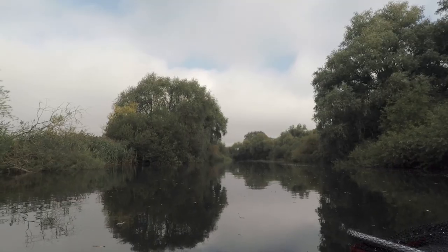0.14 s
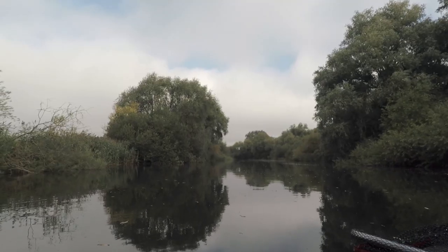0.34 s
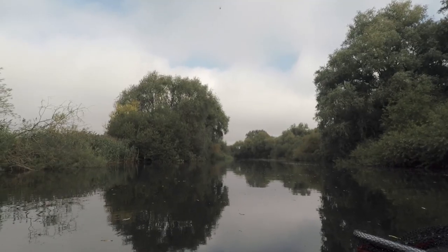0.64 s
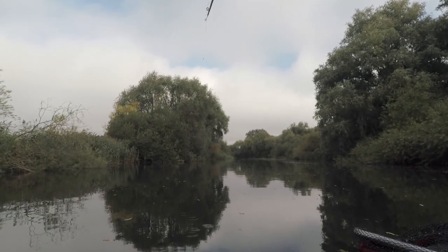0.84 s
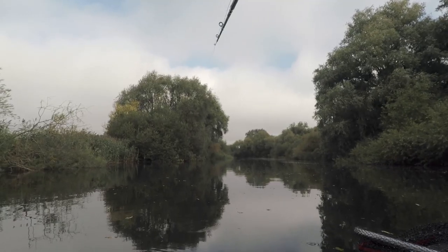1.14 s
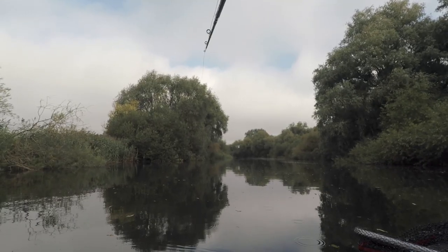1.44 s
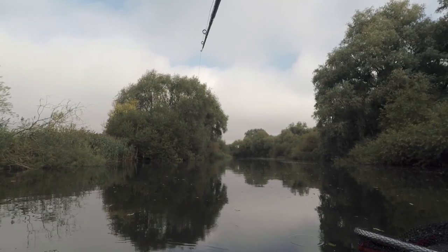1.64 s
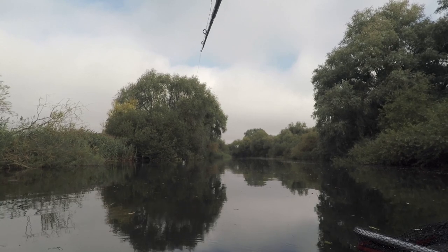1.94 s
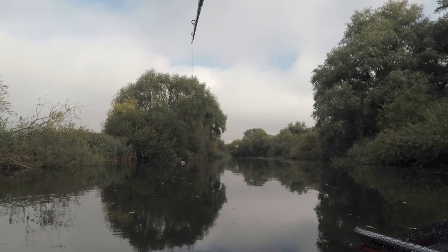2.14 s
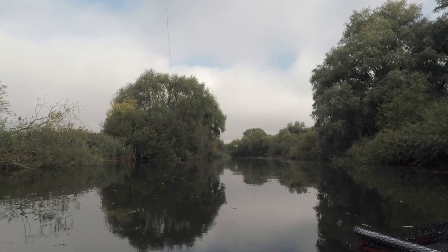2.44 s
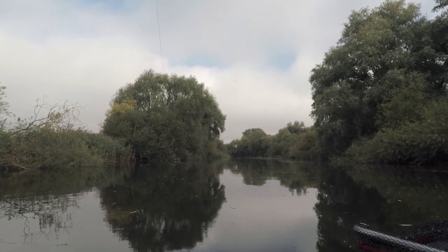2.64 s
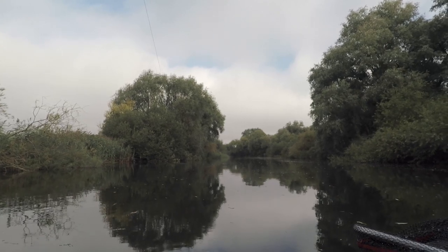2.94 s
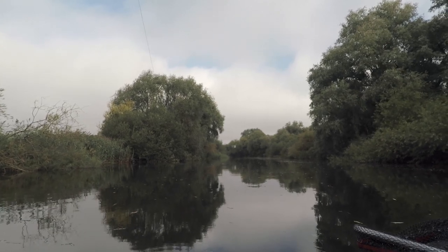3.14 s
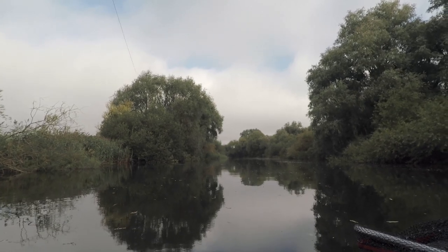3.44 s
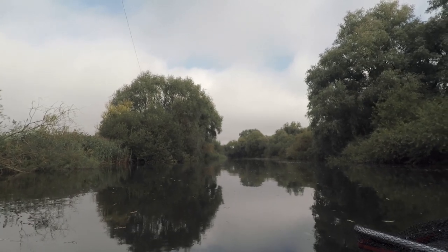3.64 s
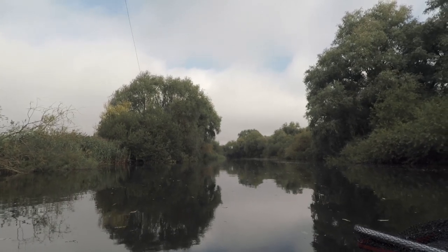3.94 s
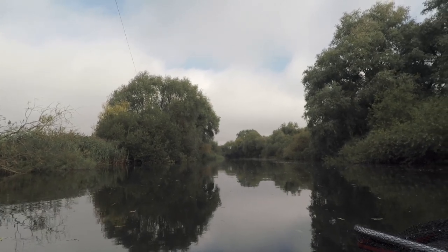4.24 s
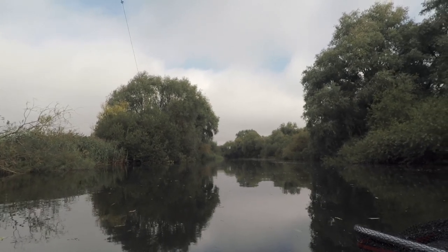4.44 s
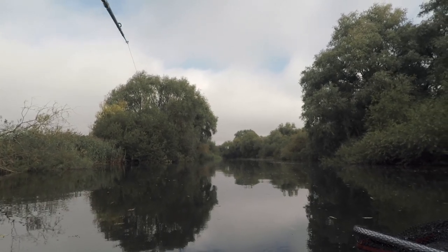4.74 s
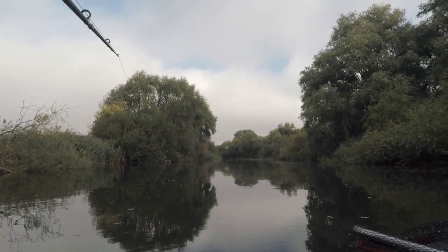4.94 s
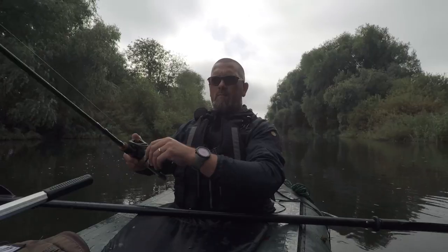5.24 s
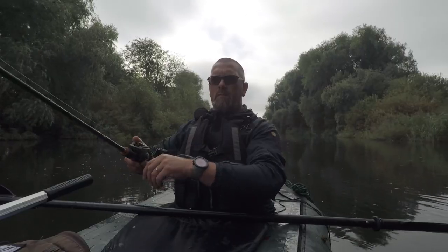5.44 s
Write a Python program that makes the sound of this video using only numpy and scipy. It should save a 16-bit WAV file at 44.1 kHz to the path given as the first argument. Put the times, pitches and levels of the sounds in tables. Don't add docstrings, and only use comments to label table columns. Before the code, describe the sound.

A fishing line is cast with a rising zip and slowing spool whir, a plop follows, then one sharp reel click over low wind rumble.

```python
import sys
import numpy as np
from scipy import signal
from scipy.fft import rfft, irfft
from scipy.io import wavfile
from scipy.ndimage import uniform_filter1d

SR = 44100
rng = np.random.default_rng(int(sys.argv[2]) if len(sys.argv) > 2 else 0)


def gain_from_db(level_db):
    decades = np.asarray(level_db, float) / 20
    return 10 ** decades


def transcribe(signal):
    frames = np.atleast_2d(signal).T
    limited = np.clip(frames, -1, 1)
    pcm = np.round(limited * 32767).astype(np.int16)
    wavfile.write(sys.argv[1], SR, pcm)


N = 247090

# ring_hz [Hz], width_hz [Hz], level_db [dB]
SPOOL_RINGS = [(4850, 300, 5), (9400, 1100, -2.5), (10800, 500, -14), (3800, 270, -6), (1930, 190, -9)]


def rms_one(x):
    return x / np.sqrt(np.mean(x ** 2) + 1e-20)


def in_time(rows):
    start_s, *columns = np.transpose(rows)
    return [np.interp(np.arange(N) / SR, start_s, column) for column in columns]


def swells(rows, rise_db_per_s, fall_db_per_s, column=2):
    t = np.arange(N) / SR
    gain = np.zeros(N)
    for row in rows:
        start_s, hold_s = row[:2]
        rise_db = rise_db_per_s * np.maximum(start_s - t, 0)
        fall_db = fall_db_per_s * np.maximum(t - start_s - hold_s, 0)
        gain += gain_from_db(row[column] - rise_db - fall_db)
    return gain


def drift(rate_hz):
    r = np.exp(-2 * np.pi * rate_hz / SR)
    return rms_one(signal.lfilter([1], [1, -2 * r, r * r], rng.standard_normal(N + SR))[SR:])


def coloured(x, spectrum):
    hz, level_db = np.transpose(spectrum)
    bins = np.maximum(np.fft.rfftfreq(N, 1 / SR), .01)
    gain = gain_from_db(np.interp(np.log(bins), np.log(hz), level_db, left=-120, right=-120))
    return rms_one(irfft(rfft(x) * gain, N))


def filtered(x, order, edge_hz, kind="low"):
    return signal.sosfilt(signal.butter(order, edge_hz, kind, fs=SR, output="sos"), x)


def resonate(x, hz, width_hz):
    r = np.exp(-np.pi * width_hz / SR)
    top = np.array([1, 0, -1]) * (1 - r * r) / 2
    return signal.lfilter(top, [1, -2 * r * np.cos(2 * np.pi * hz / SR), r * r], x + 1e-18)


def burst(at_s, length_s):
    t = np.arange(int(SR * .03)) / SR
    i = int(at_s * SR)
    return slice(i, i + len(t)), rng.standard_normal(len(t)) * np.exp(-t / max(length_s, 2e-4))


def body(x, rings, lift_db, direct_db):
    ringing = sum((-1) ** k * gain_from_db(db) * resonate(x, hz, width) for k, (hz, width, db) in enumerate(rings))
    return gain_from_db(direct_db) * x + gain_from_db(lift_db) * ringing


def shadowed(x):
    shadow_hz, shadow_db = 12600, -13
    return filtered(x, 6, shadow_hz) + gain_from_db(shadow_db) * filtered(x, 6, shadow_hz, "high")


def mellow(x, cut_hz):
    return filtered(x, 1, cut_hz)


def air_levels():
    # start_s [s], level_db [dB]
    gusts = [(0, -35.5), (.54, -28.5), (1.08, -40), (1.15, -29), (1.45, -37), (1.59, -24.5), (1.68, -39.5),
             (2.08, -22), (2.6, -36.5), (2.69, -22.5), (2.85, -32.5), (3.17, -27.5), (3.44, -21.5),
             (3.75, -27), (3.87, -33), (4.2, -30), (4.38, -25.5), (4.7, -35)]
    turn_s = 5.08
    t = np.arange(N) / SR
    last_puff = swells([(turn_s - .1, .05, -33)], 120, 300)
    gust_db = 20 * np.log10(gain_from_db(in_time(gusts)[0]) + last_puff)
    swing_db = gust_db - gust_db.mean()

    open_rumble_db = -57.5 + 1.5 * t + 0.11 * swing_db
    open_low_db = -58 + 0.046 * swing_db
    open_high_db = np.maximum(-58 - 0.71 * t, -62.5)

    sheltered, since_s = t > turn_s, t - turn_s
    return (np.where(sheltered, -38.5 - 16 * since_s, gust_db),
            np.where(sheltered, -60.5, open_rumble_db),
            np.where(sheltered, -54.5 + 2 * since_s, open_low_db),
            np.where(sheltered, -58.5 + 2 * since_s, open_high_db))


def air(lumpy_db):
    # pitch_hz [Hz], level_db [dB per Hz]
    buffet_spectrum = [(1.2, -22), (2, 8), (6, 7), (16, -6.5), (25, -23), (36, -35), (55, -48)]
    rumble_spectrum = [(18, -18), (28, -2), (40, -2), (60, -5), (85, -15), (120, -19.5), (180, -32)]
    low_spectrum = [(59, -8), (100, -2), (207, -3.5), (250, -4), (851, -14), (1500, -20.5), (1950, -29),
                    (3300, -120)]
    high_spectrum = [(590, -8), (1000, 1.5), (1830, -1.5), (2710, -4), (3150, -4), (4020, -4), (7350, -9),
                     (14400, -12), (15500, -17), (16000, -33)]
    buffet_db, rumble_db, low_db, high_db = uniform_filter1d(air_levels(), size=SR // 40)
    white = rng.standard_normal((4, N))
    push = coloured(white[0], buffet_spectrum)
    push = push / np.sqrt(uniform_filter1d(push ** 2, size=SR // 4) + 0.11)
    buffet = gain_from_db(buffet_db) * push
    rumble = gain_from_db(rumble_db + lumpy_db * drift(5.0)) * coloured(white[1], rumble_spectrum)
    low_hiss = gain_from_db(low_db + 1.4 * drift(15.0)) * coloured(white[2], low_spectrum)
    high_hiss = gain_from_db(high_db + 0.73 * drift(6.1)) * coloured(white[3], high_spectrum)
    return buffet + rumble + low_hiss + high_hiss


def spool(grain_db, patchy_db, uneven_db):
    # start_s [s], friction_db [dB], wobble_db [dB]
    spool_run = [
        [(.22, -61, -9), (.35, -52.5, 0), (.42, -50.5, -13), (.55, -52, -8), (.716, -51.5, 9.5),
         (.8, -55.5, -1), (.865, -59, -8.5)],
        [(.89, -54, 1), (1.05, -50, 11), (1.21, -53, 3.5), (1.4, -59, -9), (1.57, -59, -7), (1.72, -54.5, -1),
         (1.95, -66, -15)],
    ]
    # start_s [s], hold_s [s], level_db [dB]
    snatches = [
        (.345, 0.014, -54.5),
        (.494, 0.0036, -58),
        (.597, .003, -61),
        (.884, 0.009, -51.5),
        (1.79, 0.011, -57),
    ]
    # pitch_hz [Hz], level_db [dB per Hz]
    bright_spectrum = [(1350, -20.5), (2300, -9.5), (3140, -2.5), (4390, -1), (4870, -5), (7150, -4),
                       (9370, -5.5), (15500, -18)]
    dull_spectrum = [(350, -20), (600, -6.5), (1100, -7), (1240, -8.5), (1910, 0), (2290, -3.5),
                     (3000, -15), (3900, -26), (6600, -120)]
    rows = np.concatenate(spool_run)
    friction_db, wobble_db = in_time(rows)
    snatch = swells(snatches, rise_db_per_s=3500, fall_db_per_s=504)
    start_s, stop_s = rows[0, 0], rows[-1, 0]
    on = np.interp(np.arange(N) / SR, [start_s, start_s + 0.035, stop_s - .05, stop_s], [0, 1, 1, 0])

    turns_per_s = 100
    turn = 2 * np.pi * np.cumsum(turns_per_s * (1 + 0.27 * drift(25.0))) / SR
    contact = np.exp(3 * (np.cos(turn) - 1)) * gain_from_db(uneven_db * drift(42)) * rng.standard_normal(N)
    ring = sum(gain_from_db(db) * resonate(contact, hz, width) for hz, width, db in SPOOL_RINGS)
    knock = gain_from_db(-57 + wobble_db) * rms_one(ring)

    rub = coloured(rng.standard_normal(N) * gain_from_db(grain_db * drift(500)), bright_spectrum)
    lower = gain_from_db(patchy_db * drift(25)) * filtered(rub, 3, 6500)
    upper = gain_from_db(patchy_db * drift(27)) * filtered(rub, 3, 6500, "high")
    bright = (gain_from_db(friction_db) + gain_from_db(-5) * snatch) * gain_from_db(3.5) * (lower + upper)

    dull_db = -57.5 + 0.56 * (friction_db - rows[:, 1].max()) + 0.36 * wobble_db
    dull = (gain_from_db(dull_db) + snatch) * gain_from_db(patchy_db * drift(45)) * coloured(rng.standard_normal(N), dull_spectrum)
    return on * bright, on * (dull + knock)


def braid(flutter_db):
    # start_s [s], pitch_hz [Hz]
    line_speed = [
        [(.284, 1197), (.297, 1453), (.316, 2000), (.33, 2306), (.35, 3226), (.36, 4050), (.392, 7660),
         (.403, 8570), (.42, 8700)],
        [(.464, 8950), (.48, 9900), (.488, 8990), (.51, 8300), (.525, 8700), (.6, 8440)],
        [(1.2, 5425), (1.27, 5190), (1.33, 4900), (1.42, 4450), (1.49, 4234), (1.6, 3910), (1.745, 3557),
         (1.79, 2562), (1.82, 1144)],
    ]
    # start_s [s], hold_s [s], song_db [dB], octave_db [dB]
    bears = [(.2865, .001, -66, -50), (.2905, 0.0043, -68, -35), (.311, .006, -66, -50),
             (.327, .003, -48, -51), (.333, .008, -42.5, -56), (.343, .003, -50, -52),
             (.349, .002, -50, -65), (.3578, .0012, -34, -61), (.3645, .001, -46, -60),
             (.368, .001, -45, -60), (.372, .013, -48, -55), (.388, .008, -42.5, -60),
             (.4, 0.013, -43, -70), (.417, .004, -41.5, -80), (.464, .004, -44, -82),
             (.477, .005, -39, -82), (.487, 0.006, -38.5, -83), (.502, .004, -42, -78),
             (.511, .004, -40, -82), (.524, .003, -48, -80), (.535, .005, -46, -80),
             (.595, 0.0033, -37, -80), (.607, 0.0048, -44, -82), (.905, 0.0037, -42.5, -77.5),
             (1.19, 0.078, -47.5, -50), (1.27, 0.039, -46.5, -46), (1.31, 0.085, -49, -47),
             (1.385, 0.058, -49.5, -49), (1.46, 0.044, -46, -47), (1.52, 0.031, -56, -58),
             (1.564, 0.012, -47, -56), (1.547, 0.0029, -48, -64), (1.596, 0.011, -47.5, -64),
             (1.615, 0.034, -50.5, -55), (1.655, .035, -48.5, -58), (1.7, 0.042, -52, -52),
             (1.74, 0.0062, -62, -56), (1.762, .005, -44.5, -60), (1.79, 0.0051, -51.5, -68),
             (1.822, .003, -52, -70)]
    hz, = in_time(np.concatenate(line_speed))
    waver = .028 + 0.001546 * np.abs(np.gradient(np.log2(hz))) * SR
    song = swells(bears, 1600, 1600)
    octave = swells(bears, 1600, 1600, column=3)
    out = 0
    for strand_db in (-0.5, -13.0):
        stray = 0.01193 * drift(34.6)
        phase = 2 * np.pi * np.cumsum(hz * (1 + waver * drift(295.5) + stray)) / SR
        fray = 1 + .35 * drift(870)
        shake = gain_from_db(strand_db + flutter_db * drift(58) + 3.4 * drift(155)) * fray
        out = out + shake * (song * np.sin(phase) + octave * np.sin(2 * phase))
    return out


def splashes():
    # start_s [s], peak_db [dB],
    # length_s [s], low_hz [Hz], high_hz [Hz]
    sprays = [(1.797, -43, .013, 1200, 3700), (1.964, -37, 0.0073, 1900, 2900),
              (1.95, -39, 0.013, 1000, 2630), (1.964, -35, 0.011, 400, 1500),
              (1.975, -35, 0.011, 460, 1800), (2.008, -44, .01, 1200, 2800), (2.045, -41, .015, 700, 1500),
              (2.066, -42, .008, 330, 2300), (2.075, -47, .01, 2800, 4500), (2.088, -43, 0.011, 700, 2400),
              (2.109, -36, 0.014, 400, 1200), (2.137, -39, .006, 1510, 2500),
              (2.155, -39, .004, 1000, 2600), (2.168, -36, 0.0067, 440, 1300),
              (2.187, -43, .006, 900, 2700), (2.198, -41, .015, 900, 2200), (2.208, -43, .008, 1200, 2900),
              (2.233, -47, .004, 2200, 3200), (2.244, -41, .003, 2300, 5500), (2.249, -36, .005, 800, 1800),
              (2.264, -37, .004, 530, 2400), (2.289, -42, .008, 1100, 2800), (1.862, -39, .01, 1503, 2300),
              (5.08, -53, .033, 390, 3000), (5.11, -37, .018, 460, 900), (5.24, -35, .005, 1300, 2200),
              (5.345, -44, .008, 800, 1200), (5.395, -43, .008, 600, 1300), (0.596, -33, .0055, 1400, 4000),
              (0.33, -47, .03, 540, 1600), (0.293, -35, 0.023, 340, 3000), (.487, -43, .007, 400, 4000),
              (5.57, -46, .041, 1500, 4380)]
    out = np.zeros(N)
    for start_s, peak_db, length_s, low_hz, high_hz in sprays:
        span, crackle = burst(start_s, length_s)
        crackle = crackle * np.hanning(2 * len(crackle))[len(crackle):]
        spray = filtered(crackle, 4, [low_hz, high_hz], "band")
        out[span] += gain_from_db(peak_db) * spray[:len(out[span])]
    return out


def swish():
    # start_s [s], hold_s [s], level_db [dB]
    whips = [
        (.295, 0.027, -43),
        (.41, 0.012, -57),
        (.465, 0.01, -56),
        (.535, 0.014, -54),
    ]
    rush = rms_one(filtered(rng.standard_normal(N), 2, [230, 1200], "band"))
    return swells(whips, rise_db_per_s=395, fall_db_per_s=215) * gain_from_db(-3.5 + 4.8 * drift(17)) * rush


def knocks():
    # start_s [s], peak_db [dB]
    touches = [(0.4648, -44), (0.4704, -41), (0.4874, -41), (0.5204, -41), (0.5554, -43), (0.6144, -42),
               (0.632, -39), (0.6404, -34), (0.6456, -32), (0.6514, -38), (0.6684, -43), (0.6764, -44),
               (0.6893, -39.5), (0.6998, -39), (0.7062, -34), (0.7174, -31), (0.7292, -39), (0.7414, -45),
               (0.7696, -38), (0.7754, -43), (0.7864, -42), (0.8104, -45), (0.848, -49), (0.9144, -41),
               (0.9218, -37), (0.9482, -39), (0.9554, -40), (0.9747, -36), (0.9814, -38), (1.0026, -35),
               (1.0251, -41), (1.0435, -33), (1.0554, -35), (1.071, -37), (1.1059, -39), (1.1194, -32),
               (1.1498, -41), (1.1782, -38)]
    lift_db, touch_s = 2, .0007
    out = np.zeros(N)
    t = np.arange(int(SR * .012)) / SR
    for start_s, peak_db in touches:
        touch = rng.standard_normal(len(t)) * t * np.exp(-t / touch_s)
        ring = sum(gain_from_db(db) * resonate(touch, hz, width) for hz, width, db in SPOOL_RINGS)
        i = int(start_s * SR)
        out[i:i + len(t)] += gain_from_db(peak_db + lift_db) * ring / np.abs(ring).max()
    return out


def ticks(length_s):
    # start_s [s], peak_db [dB]
    slap_times = [(0.594, -11.5), (0.805, -16), (0.8845, -14), (1.045, -17), (1.172, -23), (1.547, -23),
                  (1.596, -22), (1.786, -17), (1.7964, -34), (1.8549, -14.5), (2.0647, -27), (2.1512, -28),
                  (2.91, -27), (4.381, -28)]
    out = np.zeros(N)
    for start_s, peak_db in slap_times:
        span, crackle = burst(start_s, length_s)
        out[span] += gain_from_db(peak_db - 12.0) * filtered(crackle, 2, 2180, "high")
    return out


def peel():
    # start_s [s], hold_s [s], level_db [dB]
    coils = [
        (1.0, 0.13, -51.5),
        (1.22, 0.067, -59.5),
    ]
    hz, width_hz = 1430, 920
    rush = resonate(resonate(rng.standard_normal(N), hz, width_hz), hz, width_hz)
    return swells(coils, rise_db_per_s=118, fall_db_per_s=56) * gain_from_db(2.0 * drift(30)) * rms_one(rush)


def bubbles():
    # start_s [s], peak_db [dB], pitch_hz [Hz], rise [per s],
    # length_s [s]
    bubble_rows = [(1.95, -55, 1760, 1, 0.011), (1.975, -40, 1095, 1, 0.0061), (2.003, -59, 1680, 0, .01),
                   (2.064, -47, 637, 3.3, 0.0092), (2.065, -60, 1610, 2, 0.013),
                   (2.105, -47, 620, -6, 0.009), (2.049, -52, 850, 1, .009),
                   (2.129, -39.5, 1363, 0, 0.0082), (2.15, -46, 560, 20, 0.01),
                   (2.167, -54, 850, 3, 0.0063), (2.255, -40, 1230, 3, 0.0045),
                   (2.265, -35.5, 415, 17.5, 0.0284), (2.296, -46, 700, 14, 0.0091),
                   (2.264, -40, 985, 5, 0.0038), (5.133, -54, 3300, 10, 0.023),
                   (5.59, -53, 3350, 16, 0.0086)]
    out = np.zeros(N)
    for start_s, peak_db, hz, rise, length_s in bubble_rows:
        t = np.arange(int(length_s * 1.44 * SR)) / SR
        shape = (1 - np.exp(-t / 0.0027)) * np.abs(np.cos(np.pi / 2 * t / t[-1])) ** 0.71
        phase = 2 * np.pi * np.cumsum(hz * np.exp(rise * t)) / SR
        i = int(start_s * SR)
        out[i:i + len(t)] += gain_from_db(peak_db) * shape * np.sin(phase)
    return out


def diffuse_splash():
    # start_s [s], hold_s [s], level_db [dB]
    splash_rows = [
        (2.56, 0.044, -63.5),
    ]
    hz, width_hz = 4500, 2300
    wash = resonate(resonate(rng.standard_normal(N), hz, width_hz), hz, width_hz)
    return swells(splash_rows, rise_db_per_s=120, fall_db_per_s=70) * rms_one(wash)


def gear(crack_db, rattle_db):
    # start_s [s], peak_db [dB], rattle_s [s], centre_hz [Hz], fall_db [dB per octave off centre]
    contacts = [(3.8700, -40, .002, 4000, 14), (3.871, -33.5, .0015, 3900, 19),
                (3.8726, -30, .001, 4000, 19), (3.8748, -43, .003, 4500, 10), (3.9047, -30, .001, 7000, -4),
                (3.9057, -12, 0.0012, 4230, 9), (3.9062, -30.5, 0.0023, 700, 8),
                (3.9068, -6, .0006, 7000, -0.5), (3.9078, -15, .001, 6000, -1),
                (3.9081, -19, 0.0021, 5000, 0), (3.9098, -21, .002, 4500, 0), (3.9135, -33, .003, 2200, 9),
                (3.9172, -40, .002, 8000, 3), (3.9195, -40, .002, 3700, 10)]
    # [s, the ring falls by 60 dB in about a third of it]
    modes = [(620, -20, 0.014), (1030, -16, 0.022), (1600, -13, 0.02), (2200, -6, .04), (3150, -11.5, 0.01),
             (3920, 0.5, 0.018), (4250, 1, 0.011), (4730, -3.5, 0.015), (5800, -5.5, 0.01),
             (6400, -2, 0.014), (7100, -5, 0.011), (7780, -7, 0.014), (8680, 0, 0.011), (9500, -2, 0.017),
             (10900, -12, .01), (13500, -23, 0.011)]
    out = np.zeros(N)
    for start_s, peak_db, rattle_s, centre_hz, fall_db in contacts:
        hit = np.zeros(int(SR * .08))
        crackle = burst(start_s, rattle_s / 2)[1]
        hit[:len(crackle)] = gain_from_db(rattle_db) * crackle
        hit[0] = 1
        rings = 0
        for k, (hz, db, t60_s) in enumerate(modes):
            level_db = db - fall_db * abs(np.log2(hz / centre_hz))
            rings = rings + (-1) ** k * gain_from_db(level_db) * resonate(hit, hz, 6.3 / t60_s)
        crack = resonate(hit, centre_hz, min(4.5 * centre_hz / max(fall_db, 2), 9000))
        contact = rings + gain_from_db(crack_db) * crack
        i = int(start_s * SR)
        out[i:i + len(hit)] += gain_from_db(peak_db) * contact / np.abs(contact).max()
    return out


def thump():
    start_s, level_db, hz, t60_s = 3.906, -39, 75, 0.072
    t = np.maximum(np.arange(N) / SR - start_s, 0)
    return gain_from_db(level_db - 60 * t / t60_s) * np.sin(2 * np.pi * hz * t)


def winding():
    # start_s [s], hold_s [s], level_db [dB]
    pulls = [(5.09, 0.016, -60), (5.15, 0.0044, -59), (5.185, 0.0089, -60), (5.205, .004, -69),
             (5.22, .015, -73), (5.24, .01, -67), (5.27, 0.018, -67), (5.31, 0.025, -57), (5.36, .03, -72),
             (5.43, .005, -70), (5.49, .005, -67)]
    settles_s, start_hz, settled_hz = 5.14, 4220, 4100
    hz = np.where(np.arange(N) / SR < settles_s, start_hz, settled_hz)
    pull = swells(pulls, rise_db_per_s=800, fall_db_per_s=500)
    phase = 2 * np.pi * np.cumsum(hz * (1 + 0.00665 * drift(146))) / SR
    return pull * gain_from_db(2.8 * drift(40)) * np.sin(phase)


def scene():
    # ring_hz [Hz], width_hz [Hz], level_db [dB]
    song_rings = [(1420, 590, -9), (1610, 90, -5), (1690, 130, 0), (2564, 97, -4), (3120, 96, -9.5),
                  (3630, 90, -14), (3844, 157, 0.5), (4290, 60, -4.5), (4370, 60, -5), (4900, 86, -2),
                  (5410, 65, -6.5), (6500, 63, -1), (7000, 78, -7), (7820, 270, -8), (8710, 170, -8),
                  (9400, 360, -11.5), (10260, 54, -8.5)]
    rub_rings = [(1420, 120, 2), (1700, 64, -2), (1900, 140, 5.5), (2240, 66, -6), (2540, 57, -3.5),
                 (3260, 130, 2.5), (3825, 160, -2), (4720, 140, 5), (5400, 62, -6), (7230, 100, -15),
                 (8740, 165, 0.5), (9300, 120, 3), (10080, 190, -3), (11000, 130, 1)]
    bright, dull = spool(grain_db=3.0, patchy_db=2.0, uneven_db=3.0)
    song = body(braid(flutter_db=0.0), song_rings, lift_db=11.5, direct_db=-8.0)
    rub = body(bright, rub_rings, lift_db=3.0, direct_db=0.5)
    slaps = body(ticks(length_s=0.0013), rub_rings, lift_db=4.5, direct_db=-6.0)
    clicks = mellow(gear(crack_db=-14.5, rattle_db=-12.5), cut_hz=10500)
    reel = rub + shadowed(song + dull + knocks()) + mellow(slaps, cut_hz=4800) + clicks + thump()
    water = bubbles() + splashes()
    return (air(lumpy_db=2.0) + reel + swish() + peel() + water + diffuse_splash() + winding())[None]


def top_cut(x):
    return signal.sosfilt(signal.butter(12, 16430, fs=SR, output="sos"), x)


def record(dry):
    duck_s, duck_db, recover_s, top_hz = 3.92, -7.5, 0.17, 15100
    since_s = np.arange(N) / SR - duck_s
    duck = np.clip(since_s / 0.0047, 0, 1) * np.exp(-np.maximum(since_s, 0) / recover_s)
    ducked = dry * gain_from_db(duck_db * duck)
    cut = signal.sosfilt(signal.cheby2(10, 50, top_hz * 1.09, fs=SR, output="sos"), ducked)
    return top_cut(cut)


dry = scene()
out = record(dry)
transcribe(out)
```